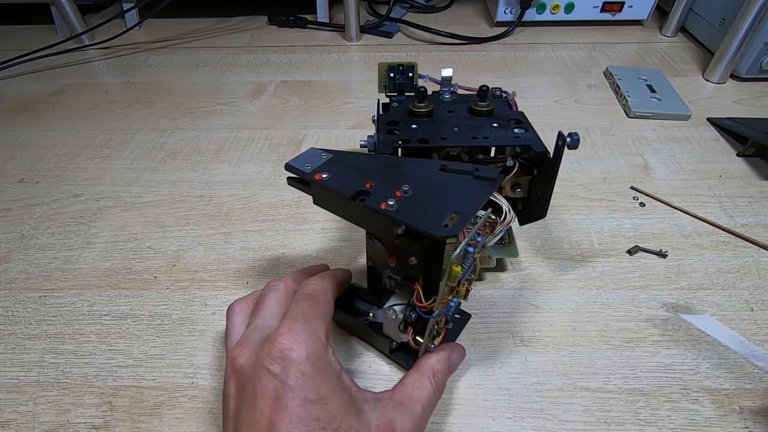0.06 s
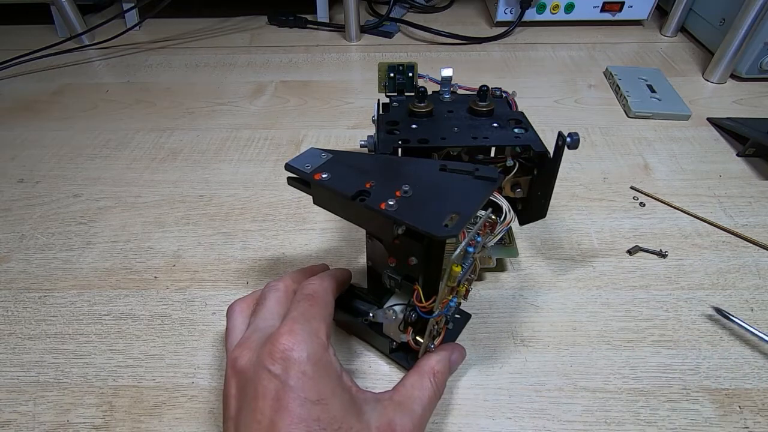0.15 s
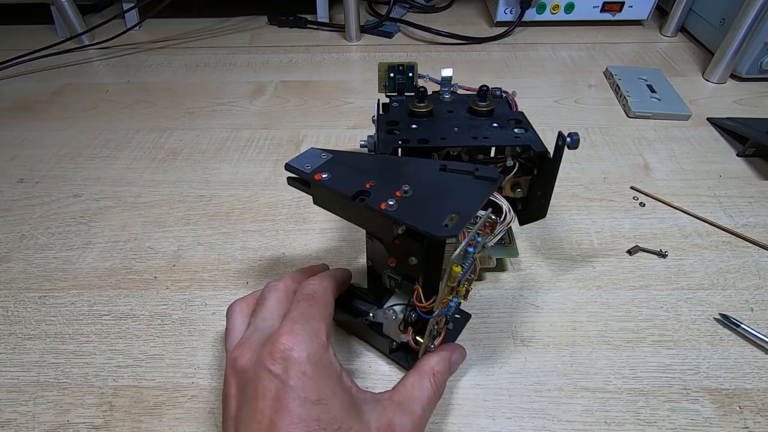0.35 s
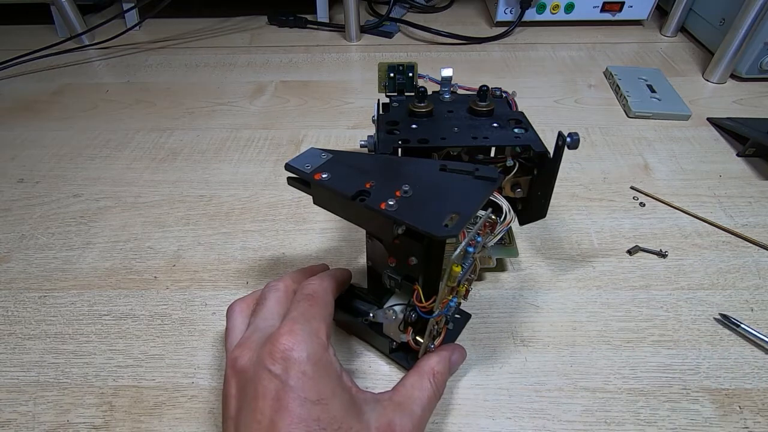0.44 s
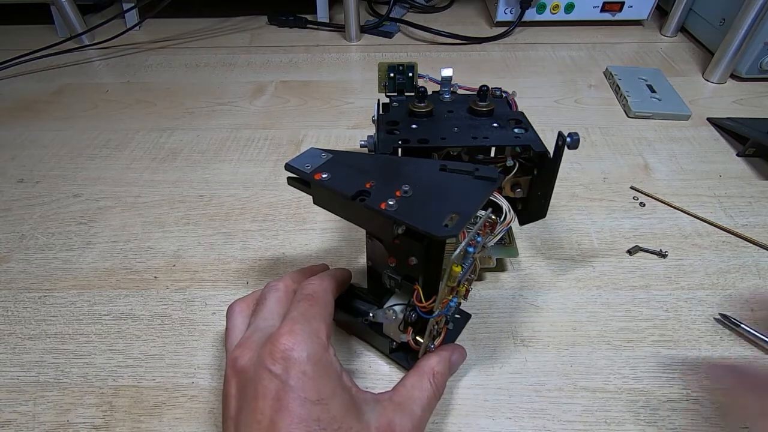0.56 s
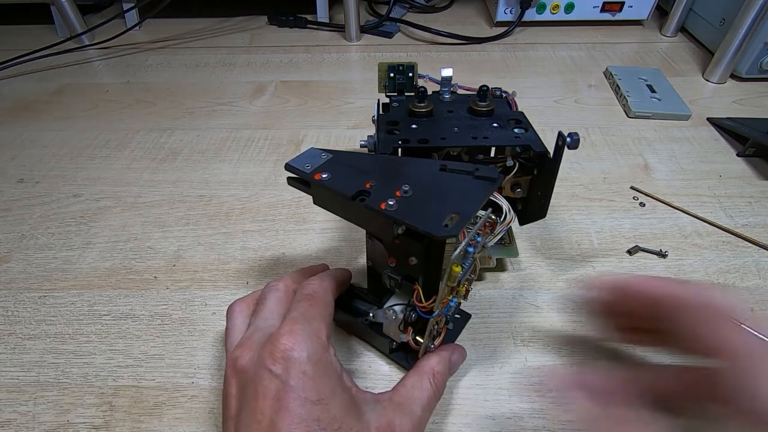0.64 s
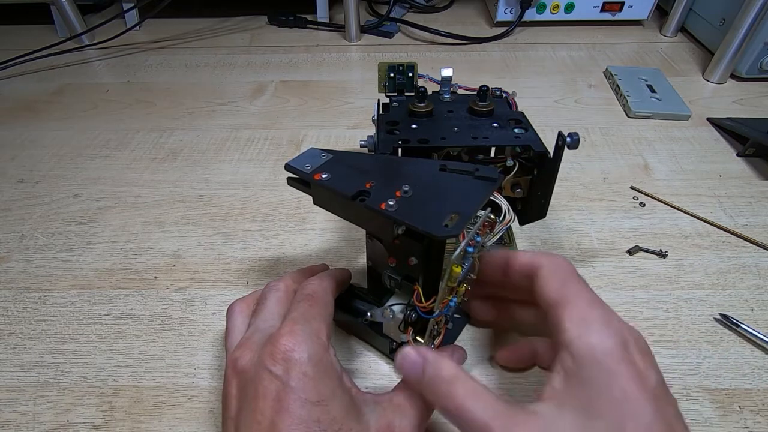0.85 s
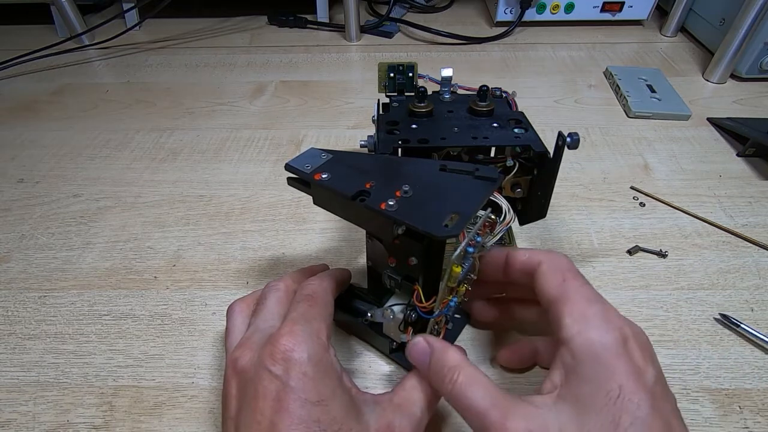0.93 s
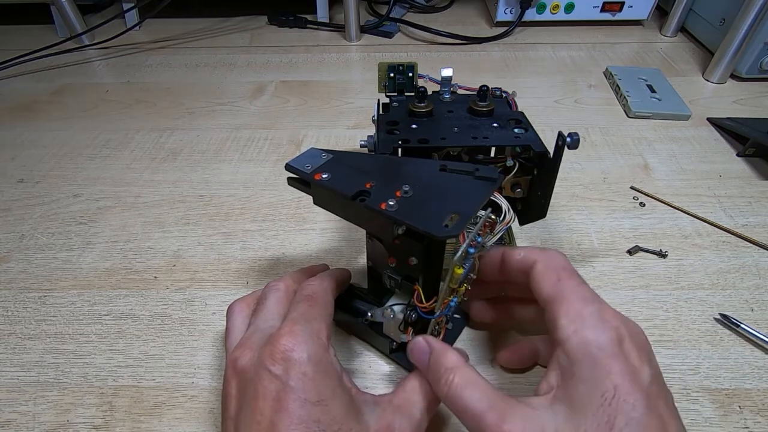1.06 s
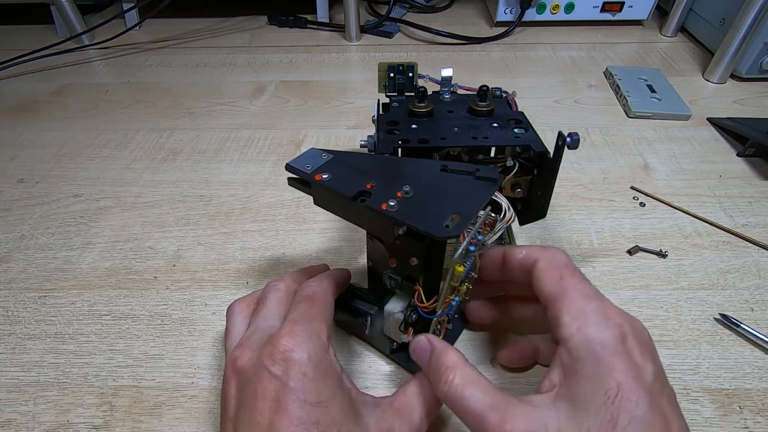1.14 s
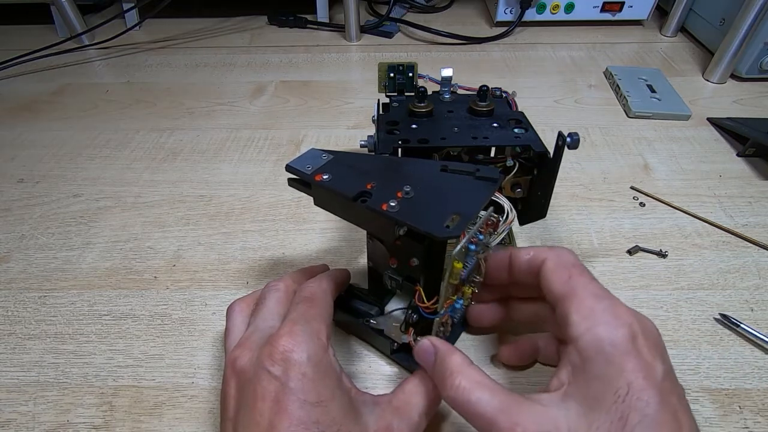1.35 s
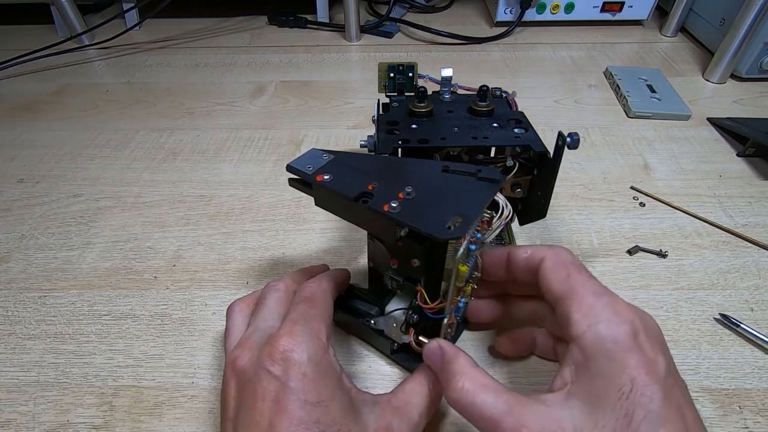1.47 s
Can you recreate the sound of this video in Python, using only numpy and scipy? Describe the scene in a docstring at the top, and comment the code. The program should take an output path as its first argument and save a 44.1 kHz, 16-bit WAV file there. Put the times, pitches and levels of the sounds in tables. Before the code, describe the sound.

Screwdriver landing on a wooden bench with a sharp double knock, then small ticks on metal.

```python
"""Mains hum, low rumble and microphone hiss run throughout, in a small room.
First a screwdriver drops on a wooden workbench: the steel shaft clicks, then the handle clacks; both leave ringing.
A hand brushes in as shaped noise, and fingers take hold of a screw with tiny dry snaps.
The screw scrapes (random slips) and ticks (short pushes that ring a metal chassis).
Last, the chassis knocks softly on the bench."""
import sys
import numpy as np
from scipy import signal
from scipy.fft import rfft, irfft
from scipy.io import wavfile

SR = 44100
rng = np.random.default_rng(int(sys.argv[2]) if len(sys.argv) > 2 else 0)


def wav_out(sig):
    """Save sig, one row per channel (or a flat mono array), as 16-bit PCM at SR to the path in sys.argv[1]."""
    wavfile.write(sys.argv[1], SR, np.round(np.clip(np.atleast_2d(sig).T, -1, 1) * 32767).astype(np.int16))


N = 66150  # length of the sound [samples]

# All levels in the tables are relative, unless noted; t60 is the time to fade by 60 dB.
# steady room air and hiss: (frequency [Hz], level [dB])
AIR_COLOUR = [(65, -12), (110, -2), (243, -4), (332, -7), (547, -9.5), (595, -10.5), (884, -13),
              (1020, -12.5), (1400, -15.5), (10100, -23), (16000, -26.5)]
# mains hum tones: (frequency [Hz], rms level [dB])
HUM_TONES = [(50, -42), (100, -66), (150, -62)]
AIR_DB, RUMBLE_DB = -47.5, -45  # rms levels
RUMBLE_LOW_HZ, RUMBLE_HIGH_HZ = 5, 81

# reverberation time of the room, before each sound scales it: (frequency [Hz], t60 [s])
ROOM_T60 = [(150, 0.32), (500, 0.28), (1500, .26), (2800, 0.2), (5000, 0.14), (14000, 0.17)]
# the room returns less treble: (frequency [Hz], level [dB])
TAIL_COLOUR = [(300, 3), (2000, 1), (4000, -3), (14000, -6)]
ROOM_GAP_S, ROOM_BUILD_S = 0.0004, 0.001  # silence before the reflections, then their build-up time
# early reflections from the surfaces around the bench: (delay [s], level [dB])
ECHOES = [(.0024, 2), (.0050, -2), (.0126, -10), (.0203, -0.5), (.0280, -4.5)]
ECHO_TOP_HZ = 2300  # soft clutter takes the treble out of the reflections

# brushing of the hand reaching over the bench: (frequency [Hz], level [dB])
RUSTLE_COLOUR = [(100, 4.5), (300, -10.5), (800, -6.5), (2000, -14.5), (4000, -16.5), (8000, -24),
                 (16000, -27)]
RUSTLE_START_S, RUSTLE_END_S, RUSTLE_FADE_S, RUSTLE_DB = 0.604, 0.916, 0.061, -48.5

# resonances of the scraping thread: (frequency [Hz], level [dB], t60 [s])
SCRAPE_MODES = [(1290, -3, 0.0089), (2380, -6, 0.025), (3450, -2, 0.037), (4480, -1, .008),
                (7550, -6.5, 0.038)]
SCRAPE_START_S, SCRAPE_END_S, SCRAPE_FADE_S, SCRAPE_DB = 1.083, 1.195, .025, -50.5
SCRAPE_PER_S = 900  # average number of slips per second

# tiny dry snaps as the fingers take hold: (time [s], level [dB])
SNAPS = [(0.9235, -29), (0.970, -29.5), (1.002, -29), (1.0498, -23.5)]
# colour of a snap: (frequency [Hz], level [dB])
SNAP_COLOUR = [(500, -9), (3300, 9), (6000, -17), (15000, -22)]
# soft knock of the chassis on the bench: (time [s], level [dB])
KNOCKS = [(1.4728, -13)]
# colour of the knock: (frequency [Hz], level [dB])
KNOCK_COLOUR = [(300, -15), (750, -2), (1000, -17), (1430, 5), (2000, -19), (2650, -5), (3400, -25),
                (12000, -34)]
# what the knock rings with: (frequency [Hz], level [dB], t60 [s])
KNOCK_MODES = [(1363, -7, 0.087), (1460, -8, .06), (2690, -4, 0.045)]

# ticks of the screw in the chassis; softer contacts have a lower treble corner:
# (time [s], level [dB], treble corner [Hz])
TICKS = [(1.1017, -18, 7900), (1.1415, -14, 5900), (1.1742, -14, 14500), (1.2338, -23.5, 8000),
         (1.3144, -7, 13900), (1.3187, -14, 11350), (1.374, -22, 6250)]
# colour of a tick: (frequency [Hz], level [dB])
TICK_COLOUR = [(300, -20), (850, -8), (1900, -7), (2500, 1.5), (3900, -4.5), (4400, -9), (6900, 5.5),
               (8200, -7.5), (11000, -2), (16000, -14)]
# resonances of the chassis: (frequency [Hz], level [dB], t60 [s])
CHASSIS_MODES = [(846, -6.5, 0.14), (1478, -6.5, 0.086), (3676, -11.5, 0.14), (3960, -6, 0.076),
                 (5300, -7, 0.051), (6400, -3, 0.032), (6735, -2, 0.043), (7120, 0, 0.05),
                 (6800, -8.5, 0.16), (10010, -8.5, 0.039)]
CHASSIS_RING_DB = -29.5

# contacts of the shaft with the bench: (time [s], level [dB])
SHAFT_HITS = [(0.2257, 7), (0.2383, -3)]
# colour of the shaft's contact: (frequency [Hz], level [dB])
SHAFT_COLOUR = [(150, -23.5), (410, -13), (580, -5), (740, -24), (1050, -2.5), (1580, 3), (2130, -8),
                (2750, -0.5), (3700, -13), (5000, -9), (6500, -18.5), (7400, -15.5), (8600, -23.5),
                (16000, -34)]
# what the shaft's landing rings with: (frequency [Hz], level [dB], t60 [s])
SHAFT_MODES = [(321, -19, .45), (355, -16, .45), (410, -13, .45), (449, -13, .35), (555, -15, .3),
               (1321, -3, .25), (1530, -1, .2), (1623, 0, .2), (1702, -3, .24), (1737, -4, .2),
               (1881, -6, .2), (1940, -5, .2), (2359, -9, .22), (2431, -7, .27), (2500, -10, .25),
               (2581, -7, .23), (2785, -9, .2), (2845, -7, .22), (3009, -9, .15)]
# quickly damped resonances of the shaft's landing: (frequency [Hz], level [dB], t60 [s])
SHAFT_BODY_MODES = [(480, -30, 0.076), (1620, -34, 0.025), (1900, -22, 0.11), (2680, -21, 0.024),
                    (5000, -25, 0.017), (7000, -29, 0.013)]
# contacts of the handle as it lands and settles: (time [s], level [dB])
HANDLE_HITS = [(0.3556, 6), (0.3568, 9.5), (0.3612, 3.5)]
# colour of the handle's contact: (frequency [Hz], level [dB])
HANDLE_COLOUR = [(100, -15), (340, -23), (470, -2.5), (720, 0.5), (1050, 1.5), (1950, 2), (2200, 1),
                 (2550, -3.5), (3000, -12), (4000, -24), (4750, -19), (5700, -29), (6600, -27), (8500, -39),
                 (16000, -41)]
# what the handle's landing rings with: (frequency [Hz], level [dB], t60 [s])
HANDLE_MODES = [(405, -12, .34), (462, -7, .3), (524, -7, .25), (617, -4, .25), (767, -5, .24),
                (835, -6, .22), (920, -4, .22), (970, -5, .22), (1021, 0, .23), (1154, -2, .23),
                (1229, -1, .23), (1284, -2, .23), (1365, 0, .24), (1423, -1, .24), (1550, -1, .24),
                (1627, -2, .23), (1680, -4, .23), (1850, -2, .24), (1901, -5, .25), (1967, -3, .27),
                (2036, -6, .27), (2520, -9, .23)]
# low thump of the bench under the handle: (frequency [Hz], level [dB], t60 [s])
THUMP_MODES = [(123, -51.5, .35), (171, -53, 0.21), (257, -46, 0.27), (330, -48, 0.38)]
SHAFT_RING_DB, HANDLE_RING_DB = -28, -31
RING_BUILD_S = 0.0019  # time for the vibration to spread through the bench
BENDING_S = 0.00118  # travel time of a 1 kHz bending wave in the struck part

TOP_HZ = 15800  # the recorder cuts everything above


def undb(db):
    """Turn decibels into a plain gain."""
    return 10 ** (np.asarray(db) / 20)


def unit(x):
    """Scale a sound to an rms of 1."""
    return x / np.sqrt(np.mean(x ** 2) + 1e-18)


def along(points, hz):
    """Read a value between (frequency, value) points on a log-frequency axis."""
    f, v = np.array(points, float).T
    return np.interp(np.log(np.maximum(hz, 1)), np.log(f), v)


def through(x, response):
    """Pass a sound through an impulse response."""
    return signal.fftconvolve(x, response)[:N]


def colour(points, size=4096):
    """Make the most front-loaded (minimum-phase) response with this spectrum and unit energy."""
    hz = np.arange(size // 2 + 1) * SR / size
    cepstrum = irfft(np.log(undb(along(points, hz))))
    # folding the second half onto the first moves the energy to the start
    cepstrum[1:size // 2] *= 2
    cepstrum[size // 2 + 1:] = 0
    response = irfft(np.exp(rfft(cepstrum)))
    return response / np.linalg.norm(response)


def pushes(rows):
    """Place one single-sample push per (time, level) row."""
    x = np.zeros(N)
    for s, db in rows:
        x[int(np.clip(s * SR, 0, N - 1))] += undb(db)
    return x


def strongest(hits):
    """Keep only the strongest contact of a landing."""
    return pushes([max(hits, key=lambda row: row[1])])


def gate(start, end, fade):
    """Fade in, hold, fade out."""
    t = np.arange(N) / SR
    return np.clip(np.minimum(t - start, end - t) / fade, 0, 1)


def ring(modes):
    """Add up fading sine tones that all start at once, as in a struck object."""
    t = np.arange(N // 2) / SR
    return sum(undb(db - 60 * t / t60) * np.sin(2 * np.pi * hz * t) for hz, db, t60 in modes)


def wash(t60_scale, count=24):
    """Make the room's dense reflections: bands of noise, each fading at its own pace."""
    size = N // 2
    t = np.arange(size) / SR
    hz = np.arange(size // 2 + 1) * SR / size
    noise = rfft(rng.standard_normal(size))
    centres = np.geomspace(100, 18000, count)
    build = 1 - np.exp(-np.maximum(t - ROOM_GAP_S, 0) / ROOM_BUILD_S)
    out = 0
    for centre, pick in zip(centres, np.eye(count)):
        share = np.interp(hz, centres, pick)  # overlapping triangular bands
        t60 = t60_scale * along(ROOM_T60, centre)
        fade = np.exp(-np.log(1000) * t / t60)
        band = irfft(noise * share, size) * build * fade
        # energy in step with bandwidth keeps the spectrum even
        out = out + band * np.sqrt(share.mean()) / np.linalg.norm(band)
    return out / np.linalg.norm(out)


def strike(force, points, direct_db, wash_db, t60_scale):
    """Follow the crack of a contact with its dense reverberant tail."""
    crack = through(force, colour(points))
    tail = through(crack, wash(t60_scale))
    return undb(direct_db) * crack + undb(wash_db) * tail


def bend(x):
    """Spread a sound in time as bending waves do: the treble arrives first."""
    hz = np.arange(N + 1) * SR / (2 * N)
    delay = BENDING_S * np.sqrt(1000 / np.maximum(hz, 50))
    lag = delay - delay[-1]  # counted from the arrival of the highest frequency
    turns = np.cumsum(lag) * hz[1]  # adding up delay over frequency gives phase
    return irfft(rfft(x, 2 * N) * np.exp(-2j * np.pi * turns))[:N]


def landing(hits, points, direct_db, echo_db, wash_db, t60_scale):
    """Contacts flex the bench top; the strongest raises a few dull echoes and the room's tail."""
    crack = bend(through(pushes(hits), colour(points)))
    blow = bend(through(strongest(hits), colour(points)))
    dulling = signal.butter(2, ECHO_TOP_HZ, fs=SR)
    echoes = signal.lfilter(*dulling, through(blow, pushes(ECHOES)))
    tail = through(through(blow, colour(TAIL_COLOUR)), wash(t60_scale))
    return undb(direct_db) * crack + undb(echo_db) * echoes + undb(wash_db) * tail


def landing_ring(hits, modes, ring_db):
    """The strongest contact of a landing sets tool and bench ringing, with a short build-up."""
    response = ring(modes)
    t = np.arange(len(response)) / SR
    response = response * (1 - np.exp(-t / RING_BUILD_S))
    return undb(ring_db) * through(strongest(hits), response)


def background():
    """Shaped noise makes room air and hiss, low noise the rumble, and steady sines the mains hum."""
    t = np.arange(N) / SR
    hz = np.arange(N // 2 + 1) * SR / N
    air = irfft(rfft(rng.standard_normal(N)) * undb(along(AIR_COLOUR, hz)), N)
    rumble_band = signal.butter(2, [RUMBLE_LOW_HZ, RUMBLE_HIGH_HZ], "band", fs=SR, output="sos")
    rumble = signal.sosfilt(rumble_band, rng.standard_normal(N))
    hum = 0
    for f, db in HUM_TONES:
        hum = hum + np.sqrt(2) * undb(db) * np.sin(2 * np.pi * (f * t + rng.random()))
    return undb(AIR_DB) * unit(air) + undb(RUMBLE_DB) * unit(rumble) + hum


def rustle():
    """The hand brushes in: soft noise that fades in and out."""
    brushing = through(rng.standard_normal(N), colour(RUSTLE_COLOUR))
    return undb(RUSTLE_DB) * gate(RUSTLE_START_S, RUSTLE_END_S, RUSTLE_FADE_S) * brushing


def handling():
    """Dry snaps come from under the fingers; a soft knock of the chassis rings briefly."""
    snaps = through(pushes(SNAPS), colour(SNAP_COLOUR))
    force = pushes(KNOCKS)
    knock = strike(force, KNOCK_COLOUR, direct_db=-4.5, wash_db=1.5, t60_scale=0.77)
    knock_ring = undb(-25.5) * through(force, ring(KNOCK_MODES))
    return snaps + knock + knock_ring


def scrape():
    """The thread turns in a run of tiny random slips, each exciting its resonances."""
    slips = (rng.random(N) < SCRAPE_PER_S / SR) * rng.standard_normal(N)
    scraping = unit(through(slips, ring(SCRAPE_MODES)))
    return undb(SCRAPE_DB) * gate(SCRAPE_START_S, SCRAPE_END_S, SCRAPE_FADE_S) * scraping


def screw():
    """Single ticks, some harder (brighter) than others, ring the metal chassis."""
    force = 0
    for s, db, corner_hz in TICKS:
        softness = signal.butter(2, min(corner_hz, SR * 4 / 9), fs=SR)
        force = force + signal.lfilter(*softness, pushes([(s, db)]))
    # a very short wash thickens each tick
    chatter = strike(force, TICK_COLOUR, direct_db=-11, wash_db=-3, t60_scale=0.074)
    room = undb(-5.5) * through(through(force, colour(TICK_COLOUR)), wash(0.85))
    chassis = undb(CHASSIS_RING_DB) * through(force, ring(CHASSIS_MODES))
    return chatter + room + chassis


def screwdriver():
    """The shaft lands with a bright click, the handle with a duller, louder clack and a low thump."""
    shaft = landing(SHAFT_HITS, SHAFT_COLOUR, direct_db=-1, echo_db=-7, wash_db=-1.0, t60_scale=1.19)
    shaft_body = undb(-6) * through(strongest(SHAFT_HITS), ring(SHAFT_BODY_MODES))
    shaft_ring = landing_ring(SHAFT_HITS, SHAFT_MODES, SHAFT_RING_DB)
    handle = landing(HANDLE_HITS, HANDLE_COLOUR, direct_db=0, echo_db=-1.5, wash_db=-1, t60_scale=1.05)
    handle_ring = landing_ring(HANDLE_HITS, HANDLE_MODES, HANDLE_RING_DB)
    thump = landing_ring(HANDLE_HITS, THUMP_MODES, 0)
    return shaft + shaft_body + shaft_ring + handle + handle_ring + thump


def scene():
    """Add up everything at the bench, in mono."""
    mix = background() + rustle() + handling() + scrape() + screw() + screwdriver()
    return mix[None]


def record(dry):
    """The recorder cuts off the highest treble with a steep filter."""
    return signal.sosfilt(signal.ellip(10, .2, 80, TOP_HZ, fs=SR, output="sos"), dry)


dry = scene()
out = record(dry)
wav_out(out)
```